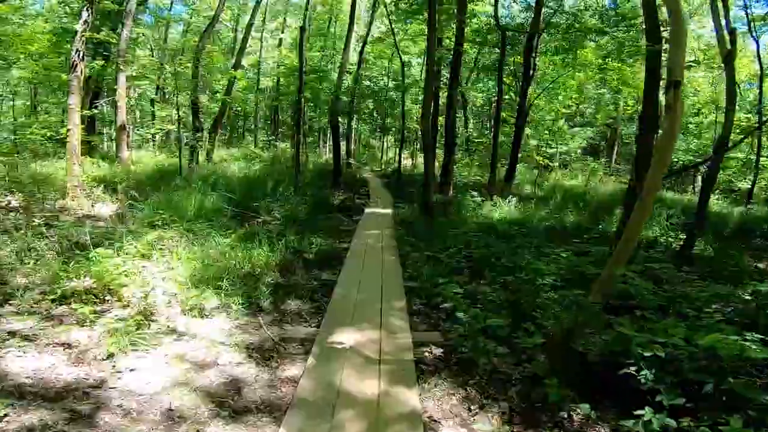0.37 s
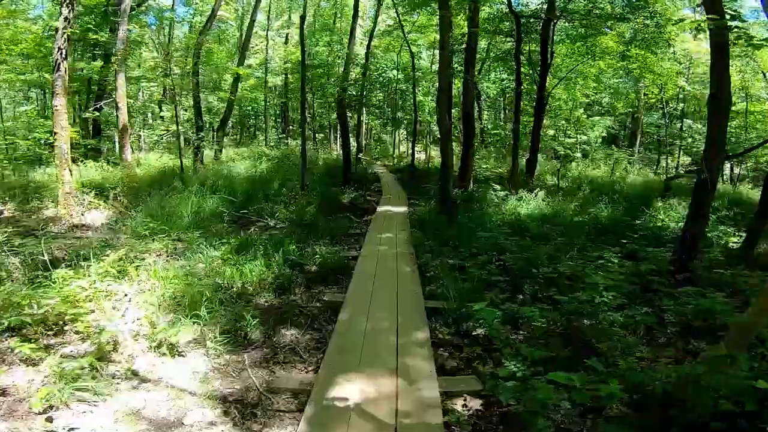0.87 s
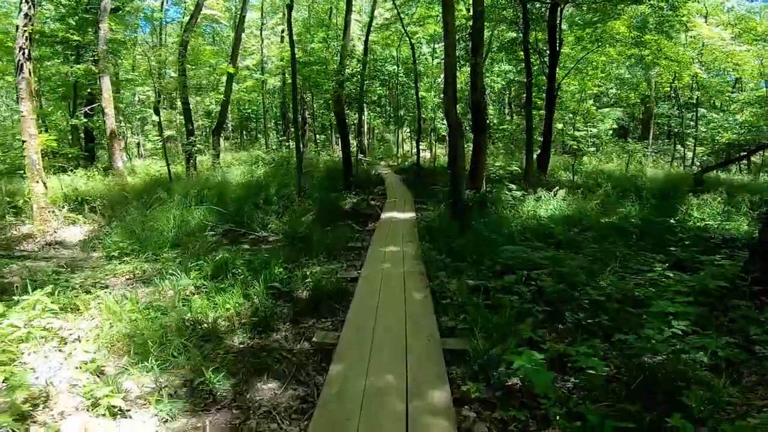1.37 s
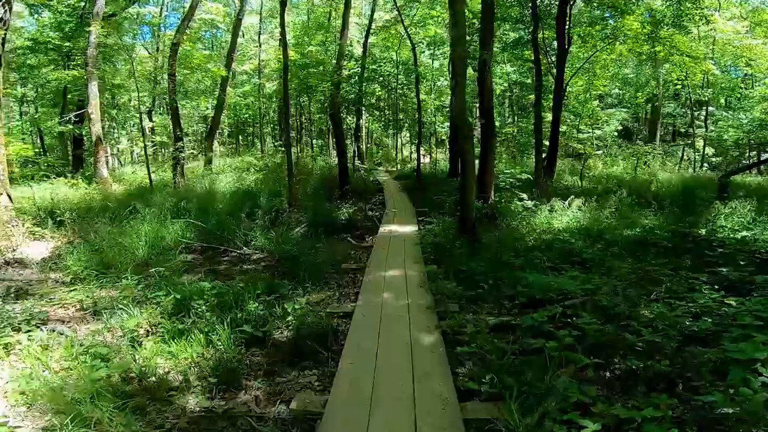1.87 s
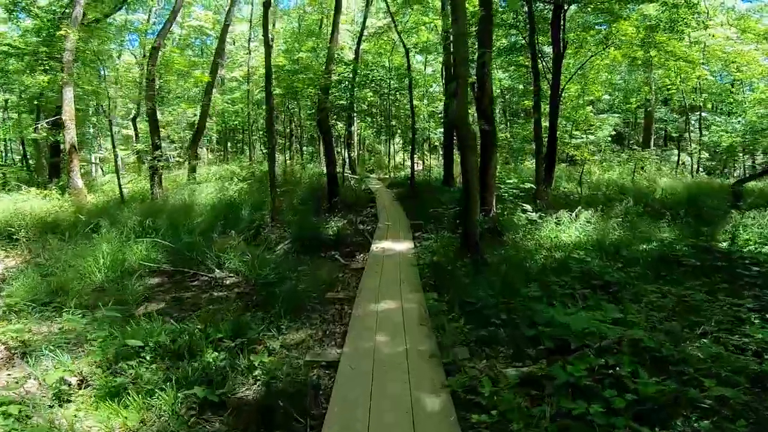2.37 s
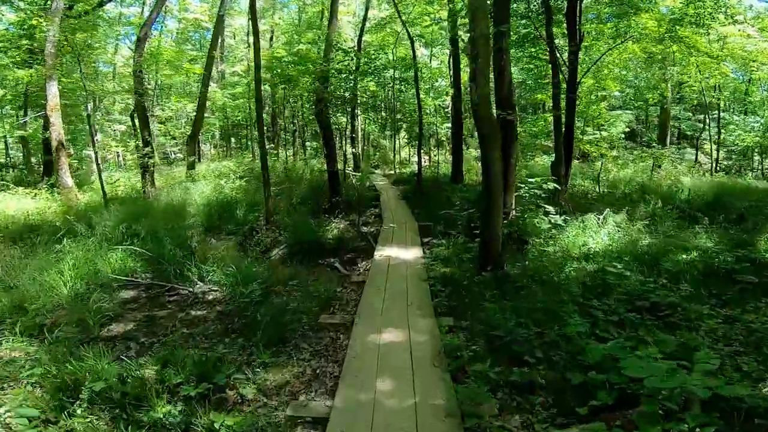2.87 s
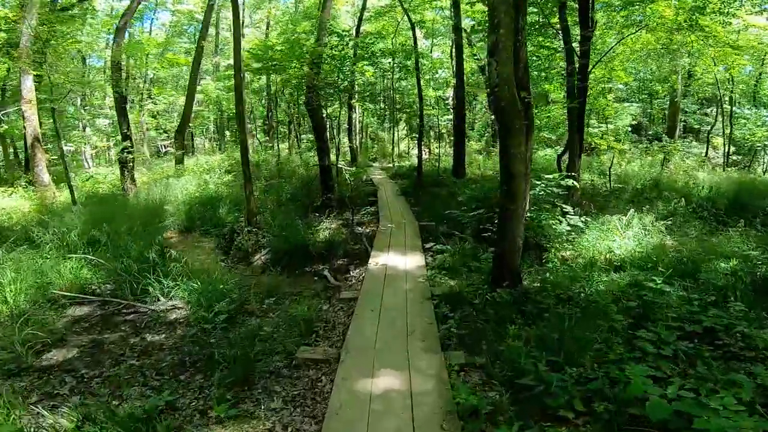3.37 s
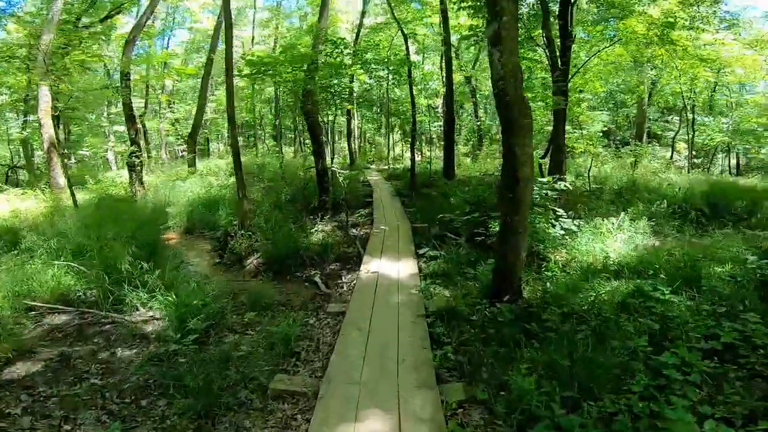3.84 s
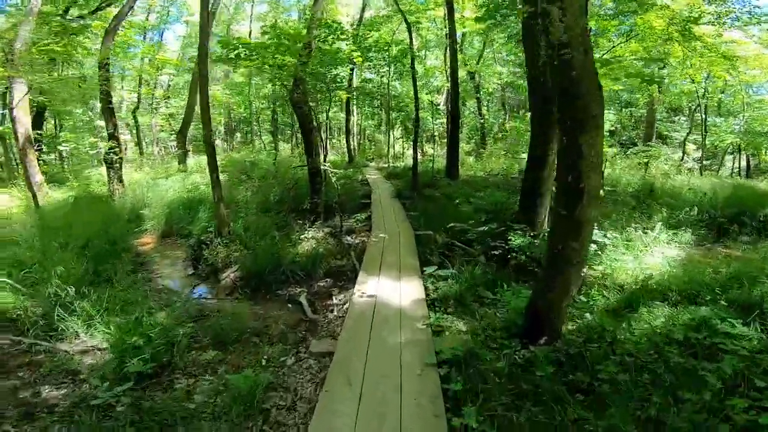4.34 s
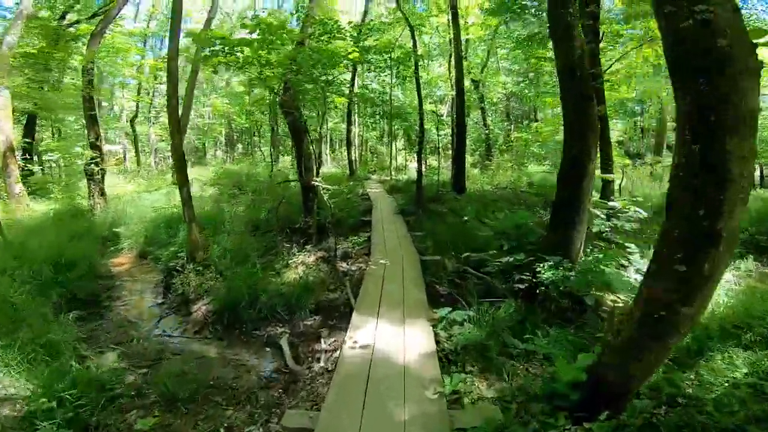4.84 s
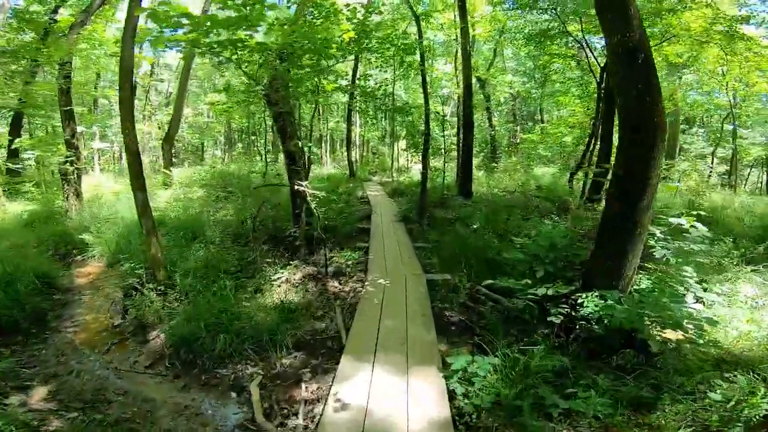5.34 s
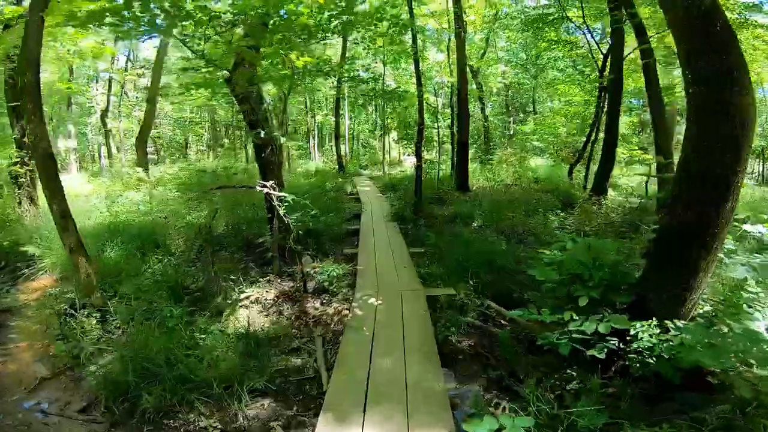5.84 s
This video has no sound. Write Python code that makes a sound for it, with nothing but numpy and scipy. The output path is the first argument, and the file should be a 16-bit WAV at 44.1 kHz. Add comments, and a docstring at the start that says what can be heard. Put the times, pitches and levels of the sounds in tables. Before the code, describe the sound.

A walker steps from gritty ground onto ringing boards, cloth and gear rustling, as near and far birds sing among echoing trees.

```python
"""A plank path through a summer wood, heard from a walker's two microphone ports. Soles thud as swelling board
rings, scuff as dense crackle and crack grit in short noise bursts; cloth and dry stems are grainy coloured noise,
gear taps are hollow rings set off by uneven slips. A near bird whistles four phrases, a far one sings falls and
rises by turns, both gliding sines smeared by the trunks, over steady leaf hiss and throbbing low wind noise."""
import sys
import numpy as np
from scipy import signal
from scipy.fft import rfft, irfft, next_fast_len
from scipy.io import wavfile
from scipy.ndimage import uniform_filter1d

SR = 44100
rng = np.random.default_rng(int(sys.argv[2]) if len(sys.argv) > 2 else 0)


def master(y):
    """Save y as 16-bit WAV."""
    cut = np.clip(np.atleast_2d(y).T, -1, 1)
    pcm = np.round(cut * 32767)  # scale
    wavfile.write(sys.argv[1], SR, pcm.astype(np.int16))


def makeup_ratio(level_db):
    """Linear amplitude ratio for a level in decibels (20 dB per factor of ten)."""
    decades = np.asarray(level_db, float) / 20
    return 10 ** decades


N = 263277
T = np.arange(N) / SR
SIZE = next_fast_len(N + SR)
HZ = np.arange(SIZE // 2 + 1) * SR / SIZE + 1e-3

# Source levels below are set ahead of the port balance and the microphone.
# Wind strength. Each row: time in seconds, level in dB before the throb.
WIND_LEVEL = [(0.0, -56.5), (0.2, -65), (0.71, -65.5), (0.88, -65), (1.35, -63), (2.06, -63.5), (2.38, -66),
              (3.06, -71), (3.35, -56), (3.55, -62.5), (4.09, -65), (4.44, -53.5), (4.62, -70),
              (4.97, -61.5), (5.2, -83.5), (5.52, -57), (5.69, -74.5), (5.97, -61.5)]
# Wind tone. Each row: frequency in Hz, relative level in dB.
WIND_TONE = [(15, -18), (30, 8), (60, 6), (100, 2), (160, -8), (300, -19.5), (600, -43.5)]
# How far the ports share the wind. Each row: frequency in Hz, likeness from 0 to 1.
WIND_ALIKE = [(20, 1), (50, 0.06), (100, 1), (300, 0.03)]
# Leaf hiss tone. Each row: frequency in Hz, relative level in dB.
LEAF_TONE = [(90, -32), (150, -0.5), (300, -9.5), (500, -12), (800, -11.5), (1200, -21), (2800, -23),
             (5000, -26.5), (6000, -36), (8200, -41), (10400, -59), (15500, -58)]
# How far the ports share the leaves. Each row: frequency in Hz, likeness (below 0 counts as 0).
LEAF_ALIKE = [(60, 0.5), (120, 0.7), (260, 0.67), (540, 0.7), (1110, 0), (2300, 0.4), (4770, 0.15),
              (9900, -0.26)]
# Cloth on cloth. Each row: time in seconds, level in dB rms.
CLOTH_LEVEL = [(0.0, -69), (0.116, -80), (0.324, -65.5), (0.56, -75), (0.92, -67.5), (1.09, -74),
               (1.39, -67), (1.88, -81.5), (2.09, -71), (2.46, -80), (2.72, -72), (2.99, -75.5),
               (3.14, -66.5), (3.65, -79), (4.26, -74.5), (4.74, -78), (4.99, -74), (5.97, -77.5)]
# Dull rubbing tone of cloth, soles and grit. Each row: frequency in Hz, relative level in dB.
RUB_TONE = [(300, -25), (600, -10), (1000, -4.5), (2000, -0.5), (3200, -4.5), (4500, -14.5), (6000, -13)]
# A leg swinging through dry stems. Each row: peak time in seconds, level in dB rms, swell in seconds,
# fade in seconds.
LEG_SWINGS = [(.35, -71, 0.05, 0.088), (.56, -73.5, 0.014, 0.079), (.9, -71.5, .15, 0.3),
              (1.28, -74, 0.029, 0.041), (1.46, -72.5, 0.084, .15), (1.91, -81.5, 0.038, 0.6),
              (2.54, -79, 0.017, .1), (2.66, -72, 0.088, 0.052), (2.94, -72, 0.022, 0.02),
              (3.1, -70, 0.032, 0.21), (3.37, -77.5, 0.017, 0.036), (3.842, -70.5, .12, .1),
              (4.24, -74, .04, 0.31), (4.85, -81.5, 0.046, 0.3), (5.2, -83, 0.025, 0.027),
              (5.35, -74.5, 0.012, 0.28), (5.55, -81.5, 0.096, 0.2)]
# Swish of dry stems. Each row: frequency in Hz, relative level in dB.
STEM_TONE = [(2000, -17), (3500, -16), (5000, -6.5), (6000, 2), (7000, 1.5), (8200, 3), (9300, -11.5),
             (11000, -9), (15500, -49)]
# A sole dragging over grit. Each row: peak time in seconds, level in dB rms, bright part against it in dB,
# swell in ms, fade in ms.
SCUFFS = [(0.149, -60.5, -25, 22, 8), (0.173, -45.5, -3, 8, 16), (0.231, -52, 3.5, 10.4, 11.2),
          (.26, -65.5, 2, 6.8, 16), (0.294, -59.5, -6, 15, 18), (0.769, -64.5, -10, 13, 3.7),
          (.89, -63.5, -4, 47, 15), (1.434, -58, -22, 1.5, 39), (2.05, -68.5, -14, 4.6, 20),
          (2.612, -51, -40, 5.8, 16), (2.931, -69, -12, 17, 28), (3.049, -49.5, -20, 1.6, 5.5),
          (3.16, -50, -25, 4, 11), (3.23, -65.5, -25, 35, 23), (4.071, -67.5, -23, 8.4, 11),
          (4.62, -69.5, -15, 17, 26), (5.19, -60.5, -22, 6.3, 13), (5.649, -70.5, -4, 57, 38),
          (5.94, -69, -9, 28, 32)]
# Bright tone of grit. Each row: frequency in Hz, relative level in dB.
GRIT_TONE = [(1500, -14.5), (3000, 2), (4500, -0.5), (5800, -4.5), (7500, 7.5), (9000, -22), (11000, -68),
             (15500, -0.5)]
# Grit cracking under a sole. Each row: break time in seconds, level in dB, dull part against it in dB,
# treble snap against it in dB, fade in ms.
CRACKS = [(0.169, -61, -2.5, -38, 5.3), (0.2273, -37.5, -1, -28, 1.9), (0.2875, -62, -6, -22, 2.5),
          (0.3454, -51, -12, -1.5, 1.5), (0.5368, -57.5, -26, -13, 3), (0.8893, -66, 10, -17, 1.7),
          (1.4285, -24, -30, -11, 2.17), (1.9052, -60.5, -30, -23, 4.1), (1.947, -61, -4, -14, 3.1),
          (2.043, -48, -6, -7.5, 3.1), (2.065, -60, -5, 3, 1.5), (2.0956, -53, -13, -22, 2.6),
          (2.6099, -48.5, -7, 3.5, 0.79), (2.636, -70, -8, 11, 3.2), (3.0475, -59, -16, -19, 3.2),
          (3.0593, -65, 10, -21, 1.1), (3.1253, -79, -5, -12, 2.9), (3.156, -47, -19, -0.5, 5.3),
          (3.8427, -58, -29, 10.5, 3.4), (4.8575, -62, -3, -28, 13), (5.3424, -72, -22, -20, 1.1),
          (5.5438, -54.5, -28, -10, 2.7)]
# Treble snap of a crack. Each row: frequency in Hz, relative level in dB.
SNAP_TONE = [(6000, -14), (9000, 2), (11000, -12), (15500, -3)]
# Trunks return mostly the mids. Each row: frequency in Hz, level in dB.
TRUNK_TONE = [(1000, -10), (2500, 0), (4500, -2), (6000, -12), (10000, -18)]
# Gear tapping and scratching on the walker. Each row: start in seconds, peak in dB, pitch in Hz.
TAPS = [(0.261, -52, 754), (0.445, -53, 610), (0.47, -51.5, 494), (0.498, -54.5, 514), (0.591, -53.5, 1270),
        (0.761, -53, 1710), (0.813, -56.5, 1900), (0.882, -51, 1420), (0.903, -51, 1740),
        (1.107, -58.5, 950), (1.278, -51, 2100), (2.923, -50.5, 1260), (3.218, -49.5, 870),
        (3.234, -51.5, 1420), (4.018, -54, 1830), (4.07, -47.5, 1360), (4.239, -54.5, 1640),
        (4.361, -55, 1380), (4.395, -57.5, 1820), (4.616, -59, 760), (4.765, -54.5, 1490),
        (5.041, -57, 840), (5.191, -53, 786), (5.36, -55.5, 1880), (5.494, -55.5, 1570), (5.67, -56.5, 910),
        (5.753, -62.5, 1540), (5.917, -60.5, 1600), (5.949, -57, 1630)]
# Bird levels are set ahead of the direct and smeared gains.
# Falling far whistle. Each row: time from the start in seconds, pitch in Hz, level in dB rms.
FALL_SHAPE = [(0, 2950, -62.5), (.035, 2688, -72), (.08, 2180, -68.5)]
# Rising far whistle. Each row: time from the start in seconds, pitch in Hz, level in dB rms.
RISE_SHAPE = [(0, 3000, -70), (.045, 3524, -74.5), (.085, 3900, -66.5)]
# Falling notes. Each row: start in seconds, gain on the shape in dB.
FALLS = [(0.706, -2.5), (1.034, 1), (1.385, 1), (1.7, -3)]
# Rising notes. Each row: start in seconds, gain on the shape in dB.
RISES = [(.84, 2.5), (1.19, 4), (1.5, -2.5), (1.85, 1), (4.83, -8)]
# Lone far whistles, one list a note. Each row: time in seconds, pitch in Hz, level in dB rms.
LONE_WHISTLES = [
    [(.3, 4140, -76), (.32, 3720, -65), (.345, 3450, -75)],
    [(2.75, 2147, -69), (2.8, 2160, -84)],
    [(3.47, 3300, -62), (3.49, 3940, -66)],
]
# Near bird, one list a note. Each row: time in seconds, pitch in Hz, level in dB rms.
NEAR_NOTES = [
    [(.365, 3340, -59), (.38, 2660, -59.5), (.395, 2752, -60.5), (.41, 3053, -59), (.425, 3680, -54),
     (.435, 3525, -49), (.45, 2740, -51)],
    [(.458, 3398, -56), (.475, 3150, -59), (.495, 3060, -60.5), (.52, 2836, -57)],
    [(1.99, 3610, -74), (2.005, 3960, -72), (2.02, 3900, -50.5)],
    [(2.03, 3580, -51), (2.05, 3384, -53.5), (2.068, 3250, -60.5), (2.087, 3380, -58), (2.102, 3200, -57),
     (2.128, 2640, -59), (2.15, 3026, -54), (2.165, 3115, -49.5), (2.178, 3700, -55), (2.188, 5140, -73)],
    [(3.495, 2687, -71.5), (3.508, 3458, -55), (3.515, 3813, -57), (3.523, 4140, -58), (3.545, 3680, -54.5),
     (3.575, 2984, -55.5), (3.6, 2470, -57)],
    [(3.68, 3104, -54), (3.7, 2857, -60), (3.715, 2497, -56), (3.735, 2800, -58.5), (3.75, 3082, -51.5),
     (3.768, 3050, -62), (3.787, 2580, -61), (3.815, 2364, -63)],
    [(5.136, 4370, -69), (5.148, 3920, -59), (5.162, 3730, -76)],
    [(5.14, 2137, -81), (5.168, 3100, -66), (5.18, 3433, -54), (5.19, 3640, -54.5), (5.2, 3280, -56.5),
     (5.215, 2860, -54)],
    [(5.228, 2550, -59), (5.24, 2840, -58), (5.258, 2684, -59)],
    [(5.315, 2977, -58), (5.34, 2850, -53), (5.36, 2620, -56.5), (5.39, 2640, -71), (5.42, 2400, -55),
     (5.447, 2250, -74)],
]
# Heel and toe on the boards. Each row: time in seconds, ring level in dB, board pitch in Hz, contact in ms,
# overtones against the ring in dB.
STEPS = [(0.41, -60.5, 166, 15, 5), (0.584, -66, 192, 11, -32), (0.801, -64.5, 157, 17, -28),
         (0.96, -58, 222, 5.8, -12), (1.347, -30.5, 224, 15.3, -31), (1.4348, -16, 172, 9.5, -18.5),
         (1.832, -59, 166, 16, -30), (1.929, -49, 197.6, 19, -35), (2.045, -42.5, 201, 6.7, -9),
         (2.531, -42, 245, 11, -15), (2.561, -42, 196, 14, -19.5), (2.614, -41.5, 268.5, 11, -7.5),
         (2.641, -53, 227, 11, -3), (2.923, -63, 192, 19, -16), (3.047, -45.5, 272, 12.5, -2.5),
         (3.127, -38.5, 244, 13, -17), (3.16, -37, 313, 5.9, -6.5), (3.696, -31.5, 185, 6.9, -31),
         (4.255, -44, 271.5, 11, -17), (4.833, -33, 187, 5.3, -31), (4.985, -63.5, 178, 12, -22),
         (5.388, -32.5, 181, 4, -25.5), (5.435, -51, 190, 12, -15), (5.474, -60, 182, 41, -27),
         (5.961, -43, 277, 13.6, -24)]
# Board overtones, varied at each step. Each row: centre pitch in Hz, relative level in dB,
# time to fall 60 dB in seconds.
BOARD_MODES = [(403, -0.5, 0.13), (533.5, -0.5, 0.094), (773, 6, 0.047), (828.6, -12.5, 0.17),
               (1037, -14, 0.01), (1270, -6.5, 0.047)]
# Rumble under a step. Each row: frequency in Hz, relative level in dB.
RUMBLE_TONE = [(70, -16), (130, -7.5), (190, 4.5), (300, -6.5), (500, -13.5), (900, -28.5), (2500, -77),
               (6000, -72)]
# Tiny falling chips of a small bird, one list a chip. Each row: time in seconds, pitch in Hz, level in dB rms.
CHIPS = [
    [(.513, 5250, -65), (.523, 3630, -50)],
    [(1.978, 5560, -69), (1.992, 4200, -68)],
]
# Walker's sounds at the ports. Each row: frequency in Hz, left minus right in dB.
NEAR_BALANCE = [(60, -4), (330, 1.5), (600, -6), (1000, -14), (1800, -14), (3200, -12), (5600, 3),
                (8000, -10.5), (12000, -5)]
# The wood's sounds at the ports. Each row: frequency in Hz, left minus right in dB.
WOOD_BALANCE = [(200, -1), (600, -0.5), (1000, -3), (1800, -1), (3200, -1.5), (5600, -1.5), (9900, 24)]
# Phase between the ports. Each row: frequency in Hz, lead of the left in radians.
LEFT_LEAD = [(0, 0), (500, -.2), (800, -.6), (1600, -.3), (3900, .1), (5000, -.8), (5800, -2.6),
             (6300, -3.6), (8600, -4.5), (12000, -4.7)]
# Top roll-off of the microphone. Each row: frequency in Hz, level in dB.
MICROPHONE = [(9000, 0), (11000, -8), (13000, -16), (15000, -24), (16000, -50)]


def across(table):
    """Read a (Hz, value) table at every frequency, on a log scale."""
    hz, value = np.transpose(table)
    return np.interp(np.log(HZ), np.log(hz + 1), value)


def unit(x):
    """Scale to rms 1."""
    return x / np.sqrt(np.mean(x ** 2))


def colour(x, table):
    """Filter through (Hz, dB) points."""
    return irfft(rfft(x, SIZE) * makeup_ratio(across(table)), SIZE)[..., :N]


def pair(table, alike):
    """Two coloured noises that share a part of themselves at each frequency."""
    likeness = np.clip(across(alike), 0, 1)
    mid, side = rfft(rng.standard_normal((2, SIZE)))
    opposed = side * np.array([[1], [-1]])
    both = np.sqrt(1 + likeness) * mid + np.sqrt(1 - likeness) * opposed
    return unit(irfft(both * makeup_ratio(across(table)), SIZE)[:, :N])


def ports(x, balance):
    """Split level and phase differences evenly between the left and right port."""
    step = makeup_ratio(across(balance) / 2) * np.exp(.5j * across(LEFT_LEAD))
    return irfft(rfft(x, SIZE) * np.array([step, 1 / step]), SIZE)[:, :N]


def add(out, s, x):
    """Mix a short sound in at time s."""
    i = max(int(s * SR), 0)
    out[i:i + len(x)] += x[:N - i]


def fade(t, t60):
    """Exponential decay that falls 60 dB in t60 seconds."""
    return np.exp(-np.log(1000) * t / t60)


def grains(per_s, spread_db):
    """Tiny slips of unequal size over a breath of noise."""
    size_db = spread_db * np.minimum(rng.exponential(size=N), 3)
    struck = rng.uniform(size=N) < per_s / SR
    slips = struck * makeup_ratio(size_db) * rng.standard_normal(N)
    return unit(slips) + rng.standard_normal(N)


def wind():
    """Low buffeting that throbs, least alike at the ports near 50 Hz and from 300 Hz up."""
    throb = unit(uniform_filter1d(rng.standard_normal(N), size=3000))
    level_db = np.interp(T, *np.transpose(WIND_LEVEL)) + 3.84 * throb
    return makeup_ratio(level_db) * pair(WIND_TONE, WIND_ALIKE)


def leaves():
    """Countless leaves blend into a steady hiss, partly shared by the ports."""
    return makeup_ratio(-70) * pair(LEAF_TONE, LEAF_ALIKE)


def stride():
    """Cloth rubs and dry stems swish with each leg swing; part is scattered and reaches each port alone."""
    cloth = makeup_ratio(np.interp(T, *np.transpose(CLOTH_LEVEL)))
    stems = makeup_ratio(-96.5)
    for s, db, swell_s, fade_s in LEG_SWINGS:
        stems = stems + makeup_ratio(db) * np.exp(-np.abs(T - s) / np.where(T < s, swell_s, fade_s))
    # each crack also shakes the stems: -65.5 dB at a -41.5 dB crack, growing 0.53 dB per dB
    for s, db, *_ in CRACKS:
        stems = stems + makeup_ratio(-65.5 + 0.53 * (db + 41.5)) * np.exp(-np.abs(T - s) / 0.015)
    out = 0
    for gain, table, per_s in ((cloth, RUB_TONE, 700), (stems, STEM_TONE, 1500)):
        scattered = 1.28 * rng.standard_normal((2, N))
        out = out + gain * unit(colour(grains(per_s, 6.8) + scattered, table))
    return out


def scuffs():
    """Dense crackle that swells and dies as the sole slides; each port also catches some of its own."""
    dull, bright = np.zeros((2, N))
    t = T[:SR // 4] - .1
    for s, db, bright_db, swell_ms, fade_ms in SCUFFS:
        shape = np.exp(-np.abs(t) * 1000 / np.where(t < 0, swell_ms, fade_ms))
        add(dull, s + t[0], makeup_ratio(db) * shape)
        add(bright, s + t[0], makeup_ratio(db + bright_db) * shape)
    crackle = grains(2500, 4.0) + .6 * rng.standard_normal((2, N))
    return dull * unit(colour(crackle, RUB_TONE)) + bright * unit(colour(crackle, GRIT_TONE))


def cracks():
    """Grit breaks in bursts that build, peak and fade within ms, with a faint tail: bright, dull, snapping parts."""
    shapes, t = np.zeros((3, N)), T[:SR // 5] - .04
    after = np.maximum(t, 0)
    build = 0.11 * np.exp(t * 1000 / 1.4)
    tail = 0.011 * fade(after, 0.26)
    # the first break is the sharpest
    first_break = 1.06 * (t >= 0) * np.exp(-after / 0.00026)
    for s, db, dull_db, snap_db, fade_ms in CRACKS:
        shape = np.where(t < 0, build, np.exp(-after * 1000 / fade_ms) + tail) + first_break
        for part, part_db in zip(shapes, (db, db + dull_db, db + snap_db)):
            add(part, s + t[0], makeup_ratio(part_db) * shape)
    # the noise is gritty: its strength jumps from sample to sample
    grit = makeup_ratio(3.5 * rng.standard_normal((3, N))) * rng.standard_normal((3, N))
    out = 0
    for shape, noise, table in zip(shapes, grit, (GRIT_TONE, RUB_TONE, SNAP_TONE)):
        out = out + colour(shape * noise, table) / np.std(colour(noise, table))
    return out


def trunks(x, t60):
    """The wood returns a grainy, fading smear, different at each port; single trunks are stronger echoes."""
    t = T[:SR]
    strength_db = 4.0 * np.minimum(rng.exponential(size=(3, SR)), 4.2)
    shared, *own = rng.standard_normal((3, SR)) * makeup_ratio(strength_db)
    echo = (.8 * shared + np.array(own)) * fade(t, t60) * (1 - np.exp(-t / .008))
    # trunks stand in clumps and gaps
    echo = echo * makeup_ratio(3 * unit(uniform_filter1d(rng.standard_normal(SR), size=500)))
    echo = echo / np.sqrt(np.sum(echo ** 2) / 2)
    return signal.fftconvolve(x[None], echo, axes=1)[:, :N]


def crack_echo(grit):
    """The cracks come back from the trunks, mostly in the mids."""
    return makeup_ratio(-10.5) * colour(trunks(grit, 0.73), TRUNK_TONE)


def taps():
    """A few uneven slips excite a short hollow ring and its weaker, higher partner."""
    out, t = np.zeros(N), T[:SR // 20]
    # cubing leaves a few strong slips among many weak ones
    slips = rng.standard_normal((len(TAPS), len(t))) ** 3
    for (s, db, hz), slip in zip(TAPS, slips):
        tone = np.sin(2 * np.pi * hz * t) + 0.31 * np.sin(2 * np.pi * 1.4 * hz * t)
        scratch = slip * np.exp(-t * 1000 / 8.4)
        tap = signal.fftconvolve(scratch, fade(t, 0.013) * tone)
        add(out, s, makeup_ratio(db) * tap / np.max(np.abs(tap)))
    return out


def bird(notes, direct_db, flicker_db, wet_db, t60):
    """Gliding sine whistles, heard directly and through the trunks."""
    song = np.zeros(N)
    for note in notes:
        s, hz, db = np.transpose(note)
        t = np.arange(s[0], s[-1], 1 / SR)
        edge = np.clip(np.minimum(t - s[0], s[-1] - t) / .005, 0, 1)
        glide = uniform_filter1d(np.interp(t, s, hz), size=200, mode="nearest")
        whistle = np.sin(2 * np.pi * np.cumsum(glide) / SR)
        add(song, s[0], np.sqrt(2) * makeup_ratio(np.interp(t, s, db)) * edge * whistle)
    # leaves and moving air make the direct sound flicker
    drift = uniform_filter1d(uniform_filter1d(rng.standard_normal(N), size=160), size=160)
    flicker = makeup_ratio(flicker_db * unit(drift))
    return makeup_ratio(direct_db) * flicker * song + makeup_ratio(wet_db) * trunks(song, t60)


def far_bird():
    """Falling and rising whistles and a few lone ones, with far more smear than direct sound."""
    notes = []
    for shape, starts in ((FALL_SHAPE, FALLS), (RISE_SHAPE, RISES)):
        notes += [np.add(shape, (s, 0, db)) for s, db in starts]
    return bird(notes + LONE_WHISTLES, direct_db=-12, wet_db=4, t60=1.1, flicker_db=6)


def near_bird():
    """Four whistled phrases, the direct sound standing clearer in the smear."""
    return bird(NEAR_NOTES, direct_db=-2.5, wet_db=1, t60=.85, flicker_db=3.5)


def steps():
    """A soft push swells the board's bending ring, whose pitch sags; overtones come first, a rumble lingers."""
    out, shake, t = np.zeros(N), np.zeros(N), T[:SR // 2]
    noise = rng.standard_normal(N)
    chance = rng.uniform(size=(len(STEPS), len(BOARD_MODES), 3))
    for (s, db, hz, contact_ms, over_db), draws in zip(STEPS, chance):
        # higher boards ring longer
        t60 = 0.064 * (hz / 190) ** 1.36
        push = np.sin(np.pi / 2 * np.clip(t * 1000 / contact_ms, 0, 1)) ** 2
        after = np.maximum(t - contact_ms / 1000, 0)
        cycles = hz * (t + 0.0038 * (1 - np.exp(-t / 0.0026)))
        ring = push * fade(after, t60) * np.sin(2 * np.pi * cycles)
        for (mode_hz, mode_db, mode_t60), (loudness, pitch, phase) in zip(BOARD_MODES, draws):
            quick = (1 - np.exp(-t * 1000 / (0.05 * contact_ms))) * fade(t, mode_t60)
            level = makeup_ratio(over_db + mode_db + 2 * (loudness - 2.0))
            mode_cycles = mode_hz * (1 + 0.209 * (pitch - .5)) * t + phase
            ring = ring + level * quick * np.sin(2 * np.pi * mode_cycles)
        add(out, s - .003, makeup_ratio(db) * ring)
        # rumble set to -49.5 dB at a -39 dB step, growing 0.6 dB per dB
        rumble_level = makeup_ratio(-49.5 + .6 * (db + 39))
        add(shake, s, rumble_level * (1 - np.exp(-t / 0.0017)) * fade(t, 0.27))
    rumble = colour(shake * noise, RUMBLE_TONE) / np.std(colour(noise, RUMBLE_TONE))
    return out + rumble


def chips():
    """Tiny falling whistles of a small bird close by, mostly direct and steady."""
    return bird(CHIPS, direct_db=0, wet_db=-6, t60=.5, flicker_db=0)


def scene():
    """Walker close by, birds and leaves out in the wood, wind on the ports."""
    grit = cracks()
    walker = stride() + scuffs() + grit + taps() + steps()
    wood = leaves() + crack_echo(grit) + far_bird() + near_bird() + chips()
    return ports(walker, NEAR_BALANCE) + ports(wood, WOOD_BALANCE) + wind()


def low_pass(x):
    """Removes everything above the highest recorded frequency."""
    return signal.sosfilt(signal.butter(12, 15100, fs=SR, output="sos"), x)


def record(dry):
    """A microphone that loses the top."""
    mix = colour(dry, MICROPHONE)
    return low_pass(mix)


dry = scene()
out = record(dry)
master(out)
```